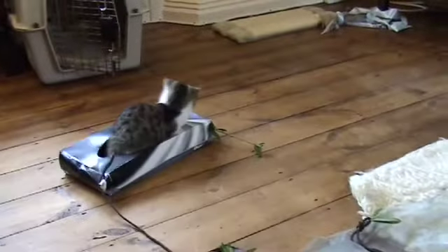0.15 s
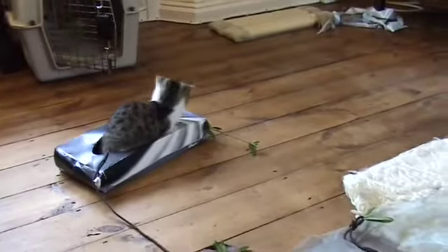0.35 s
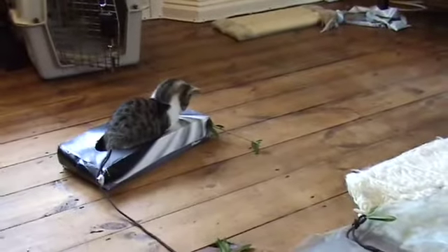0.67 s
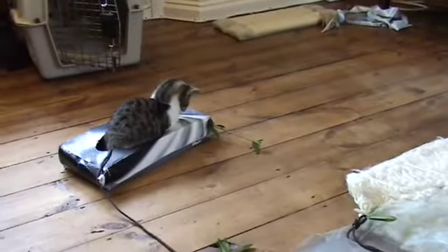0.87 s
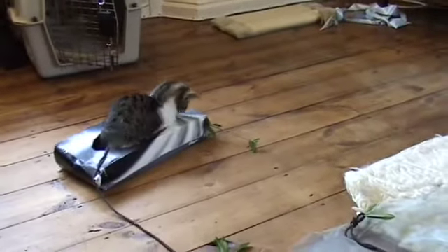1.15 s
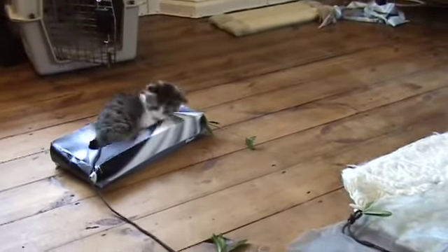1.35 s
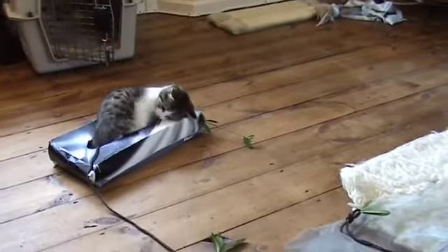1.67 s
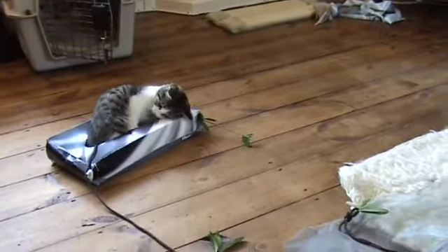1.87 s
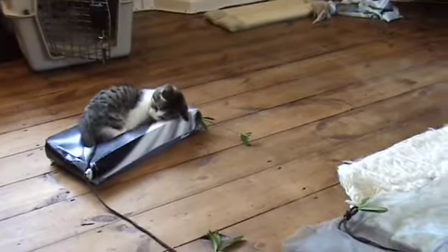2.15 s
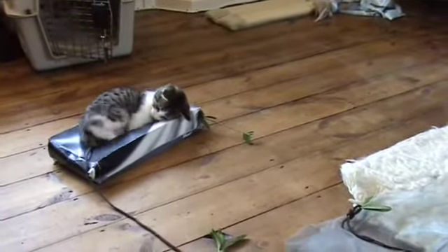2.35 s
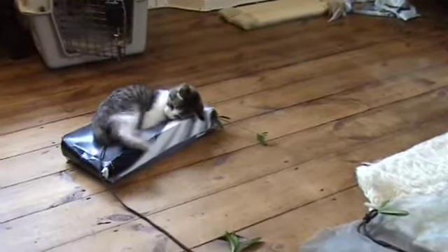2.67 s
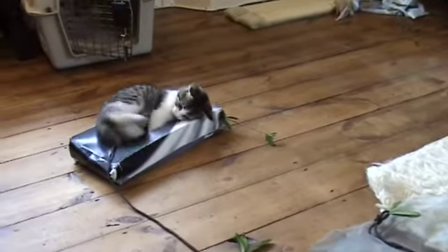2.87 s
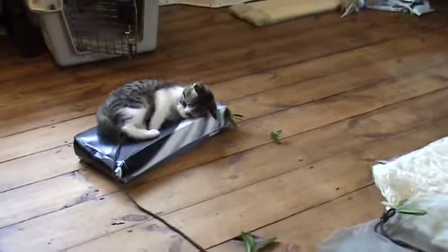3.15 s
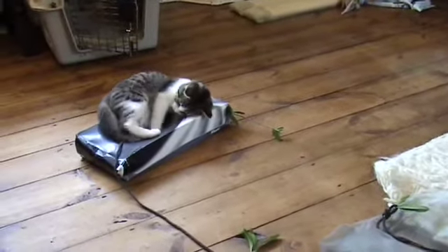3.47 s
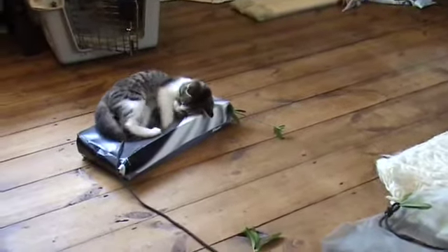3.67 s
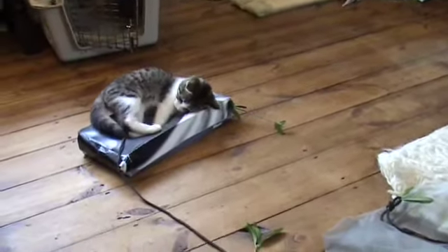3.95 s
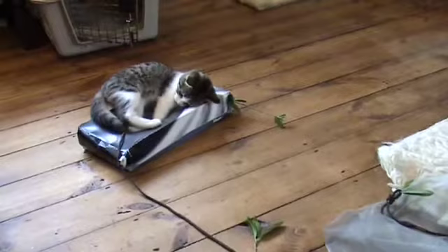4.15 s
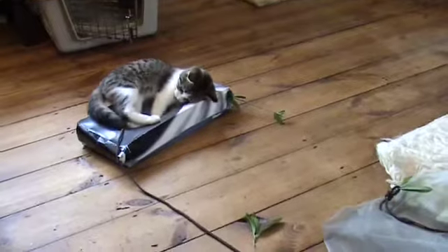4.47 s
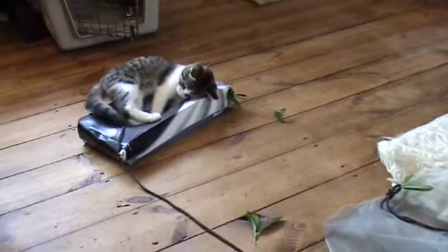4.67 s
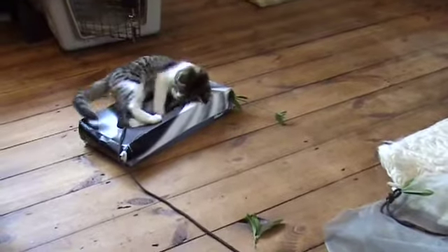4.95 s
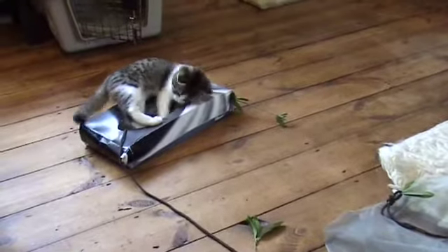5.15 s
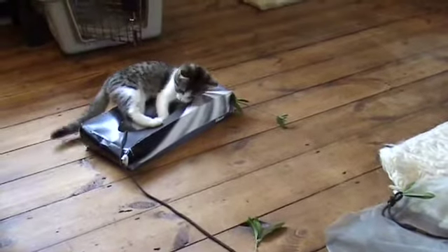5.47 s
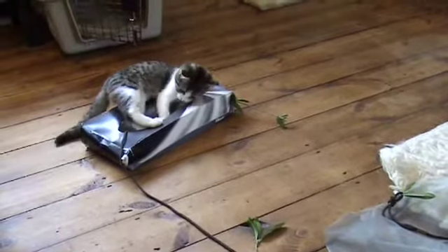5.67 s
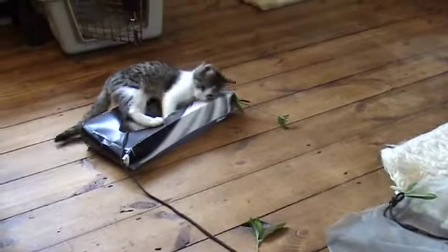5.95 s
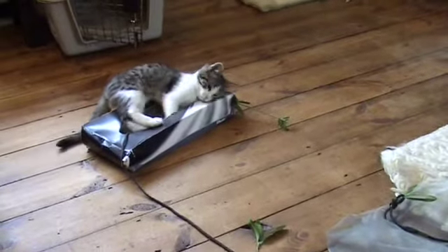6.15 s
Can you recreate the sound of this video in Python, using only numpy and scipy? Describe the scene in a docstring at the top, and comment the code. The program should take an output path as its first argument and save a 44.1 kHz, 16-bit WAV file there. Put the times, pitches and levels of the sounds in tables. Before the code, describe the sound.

In a small bare room with faint steady hiss, a kitten plays on a paper-wrapped hollow box on floorboards. At 0 s a strong boxy knock, paper crackle and low floor thud land together, followed by lighter taps and rustle until 0.35 s. It nearly quiets, with a tiny tap at 0.8 s. From 1.2 to 1.35 s comes a tight, heavy flurry of low knocks and scuffing, its first thump the strongest. Single pats with crisp snaps follow at 1.85, 1.95, 2.1 and 2.3 s. Softer scratches and taps run from 2.7 to 3.6 s, then one loud hollow knock at 3.7 s. Faint fidgeting and light taps fill 4.0 to 4.7 s. A brisk crinkly cluster strikes from 5.05 to 5.2 s, hardest last. After quiet, a snap with rustle at 5.82 s and small taps at 6.04 and 6.2 s end it. Short room echoes answer each hit.

```python
"""A small bare room where kittens paw at a paper-wrapped cardboard box and loose paper on a wooden floor.
Over a faint drifting hiss, dragged paper rustles as dense random micro-snaps that also shake the box.
Blows combine a decaying sine, ringing box modes and a noise snap of paper; landings ring floorboard modes.
Early echoes and a dense tail of shaped noise answer every blow, landing and rustle."""
import sys
import numpy as np
from scipy import signal
from scipy.fft import rfft, irfft
from scipy.io import wavfile
from scipy.ndimage import uniform_filter1d

SR = 44100
rng = np.random.default_rng(int(sys.argv[2]) if len(sys.argv) > 2 else 0)


def field_ratio(decibels):
    """Amplitude ratio for a level in dB (20 dB per decade); scalars and array-likes work."""
    return 10 ** (np.asarray(decibels, dtype=float) / 20)


def int16_out(signal):
    """Quantize to a 16-bit WAV file."""
    q = np.round(np.clip(np.atleast_2d(signal).T, -1, 1) * 32767)
    wavfile.write(sys.argv[1], SR, q.astype(np.int16))


N = 278712  # samples, about 6.3 s

# Resonances of the hollow box. Each row: nominal frequency in Hz, relative level in dB, t60 in seconds.
BOX_MODES = [(334, -6, 0.017), (360, -7, 0.098), (485, -12.5, 0.17), (560, 2.5, 0.019), (658, 3.5, 0.022),
             (765, 1, 0.012), (890, 12, 0.01), (1182, 14, 0.015), (1270, 7.5, 0.04), (1640, -40, 0.015)]
# Resonances of the floorboards. Each row: nominal frequency in Hz, relative level in dB, t60 in seconds.
BOARD_MODES = [(122, -13, 0.03), (153.3, 12, 0.069), (210, 24.5, 0.018)]
# The wrapping dragged under paws and claws. Each row: start of the hold in seconds, hold in seconds,
# relative rustle level in dB, relative push on the box in dB, brightness in dB per octave.
DRAGS = [(0.0, 0.011, -28, -20.5, -3.5), (.12, 0.097, -49, -39.5, -2.5), (.31, 0.033, -49, -33.5, -2),
         (.45, 0.18, -81, -55, -3), (.625, 0.077, -59.5, -57, 2), (.78, 0.07, -70, -61.5, 2),
         (1.177, 0.05, -36, -39, 2.5), (1.218, 0.063, -30.5, -31, -3), (1.361, 0.01, -37, -34.5, -3.5),
         (1.483, 0.01, -46.5, -39.5, -1.5), (1.598, 0.031, -43, -41.5, 1.5), (1.69, 0.093, -49, -49, 0.5),
         (1.86, 0.054, -47.5, -39.5, 0.5), (1.948, 0.013, -37, -36, -1), (2.127, 0.013, -43, -33, -3),
         (2.18, 0.093, -44, -44.5, 1), (2.308, 0.0067, -46.5, -37, -4.5),
         (2.708, 0.0052, -49.5, -45.5, 0.5), (2.879, 0.085, -57.5, -56.5, .6),
         (2.969, 0.014, -45.5, -39.5, 1), (3.3, .05, -53.5, -58, 0.5), (3.361, .12, -54, -55.5, 3),
         (3.512, 0.056, -57.5, -46, 1), (3.718, 0.041, -44, -33.5, 1.5), (4.02, 0.0054, -45.5, -50, -3),
         (4.304, 0.0089, -55.5, -52, 0.5), (4.378, 0.025, -42.5, -42, -2.5), (4.47, 0.12, -66, -53.5, 2),
         (4.64, 0.017, -47.5, -44.5, -0.7), (4.89, 0.068, -60.5, -58.5, 1.5),
         (4.98, 0.037, -50.5, -55.5, 1), (5.065, 0.01, -44.5, -38.5, -2.5), (5.13, 0.045, -56.5, -33, 0),
         (5.195, 0.023, -38, -35.5, -2.5), (5.27, 0.019, -48, -66, -6), (5.782, 0.0079, -45, -45.5, 3.5),
         (5.838, 0.0077, -30, -30, -3.5), (5.97, 0.085, -48.5, -68, 1.5), (6.048, 0.011, -37.5, -57, -5.5),
         (6.1, 0.018, -49, -46, 3), (6.191, 0.073, -40, -42, 0.5)]
TRAVEL_S = 0.002  # from the paws to the microphone


def evened(x):
    """Scales to rms 1."""
    return x / np.sqrt(np.mean(x ** 2) + 1e-20)


def peaked(x):
    """Scales to a peak of 1."""
    return x / abs(x).max()


def read(points, hz):
    """Reads a curve on a log-frequency axis."""
    f, value = np.transpose(points)
    return np.interp(np.log(hz + 1), np.log(f + 1), value)


def add(mix, s, sound):
    """Mixes a sound in at time s, in seconds."""
    part = mix[round(s * SR):][:len(sound)]
    part += sound[:len(part)]


def pair(z, other, points, hz):
    """Blends two independent spectra into two microphone ports that agree by the given likeness."""
    same = np.clip(read(points, hz), -1, 1)[:, None]
    mid, side = np.sqrt((1 + same) / 2), np.sqrt((1 - same) / 2)
    return np.array([mid * z + side * other, mid * z - side * other])


def high_pass(x, hz):
    """Causal bass cut, 18 dB per octave."""
    return signal.sosfilt(signal.butter(3, hz, "high", fs=SR, output="sos"), x)


def band(x, lo_hz, hi_hz):
    """Causal band-pass."""
    return signal.sosfilt(signal.butter(3, [lo_hz, hi_hz], "band", fs=SR, output="sos"), x)


def ring(modes, centre_hz, octaves, spot):
    """Dying modes, fed most near the centre; the spot and the paw's weight shift each level and pitch a little."""
    t = np.arange(SR // 8) / SR
    hz, db, t60 = np.transpose(modes)[:, :, None]
    level_shift, pitch_shift = spot[:len(modes), None], spot[-len(modes):, None]
    fed = field_ratio(db + 2.5 * level_shift) / (1 + (np.log2(hz / centre_hz) / octaves) ** 2)
    bent_hz = hz * (1 + 0.024 * pitch_shift)
    partials = fed * field_ratio(-60 * t / t60) * np.sin(2 * np.pi * bent_hz * t)
    return peaked(partials.sum(0))


def hiss():
    """Quiet house and microphone noise: coloured random spectra with patches that drift in level."""
    # Each row: frequency in Hz, relative density in dB per Hz.
    hiss_colour = [(15, -68), (25, -3), (132, -9), (227, -1), (281, -10.5), (368, -2), (432, -8.5),
                   (481, -5), (893, -10), (1270, -12), (4610, -22), (5870, -24.5), (15400, -36.5)]
    # Each row: frequency in Hz, left-right likeness from -1 to 1.
    hiss_likeness = [(60, -0.42), (240, -0.67), (950, -0.58), (3770, -0.26), (15000, 0.38)]
    frames, hz = N // 256 + 5, np.fft.rfftfreq(1024, 1 / SR)
    a, b, c, d, patches = rng.standard_normal((frames, 513, 5)).T
    patches = uniform_filter1d(uniform_filter1d(patches, size=10, axis=0), size=14, axis=1)
    patch_db = 1.8 * evened(patches)
    z = pair(a + 1j * b, c + 1j * d, hiss_likeness, hz)
    z = z * field_ratio(read(hiss_colour, hz)[:, None] + patch_db)
    noise = signal.istft(z, nperseg=1024, noverlap=768)[1][:, :N]
    return field_ratio(-51) * evened(noise)


def drags(t, peak_db, settles_db_per_s):
    """Power of every drag over time: a quick grip, a hold, a steady settling as the paw lets go."""
    start, held = np.transpose(DRAGS)[:2, :, None]
    grip_db = 684 * np.maximum(start - t, 0)  # rises at 684 dB per second
    settled_db = settles_db_per_s * np.maximum(t - start - held, 0)
    return field_ratio(peak_db[:, None] - grip_db - settled_db) ** 2


def rustle():
    """Dense uneven micro-snaps of the sheet, brighter when claws scrape; the same drag shakes box and boards."""
    # Base colour of the paper. Each row: frequency in Hz, relative density in dB per Hz.
    paper_colour = [(650, -34), (1100, -4.5), (1310, -11), (1670, -7), (2410, -8.5), (2820, -9.5),
                    (3550, -11), (6890, -13.5), (15400, -36.5)]
    # the kittens are never quite still: fidgeting lies under every drag
    fidget_sheet_db, fidget_box_db, fidget_db_per_octave = -78, -69, 12
    sheet_db, push_db, bright_db = np.transpose(DRAGS)[2:]
    size = field_ratio(3.4 * np.minimum(rng.exponential(1, (2, N)), 5)) * rng.standard_normal((2, N))

    snaps = size[0] * (rng.random(N) < 7000 / SR)  # about 7000 per second
    hz, t, z = signal.stft(snaps, SR, nperseg=256)
    sheet, still = drags(t, sheet_db, 211), field_ratio(fidget_sheet_db) ** 2
    sheet_power = sheet.sum(0) + still
    # the loudest drag sets the colour
    tilt_db = (np.clip(bright_db, -6, 8) @ sheet + fidget_db_per_octave * still) / sheet_power
    patches = rng.standard_normal(z.T.shape).T
    patches = evened(uniform_filter1d(uniform_filter1d(patches, size=5, axis=0), size=7, axis=1))
    octave = np.log2((hz[:, None] + 50) / 4500)
    colour = field_ratio(read(paper_colour, hz)[:, None] + octave * tilt_db)
    # tilting keeps the colour's mean power between 2 and 10 kHz
    colour /= np.sqrt((colour[(hz > 2000) & (hz < 10000)] ** 2).mean(0))
    paper = signal.istft(z * colour * field_ratio(2.43 * patches), SR, nperseg=256)[1][:N]

    shoves = size[1] * (rng.random(N) < 1100 / SR)  # about 1100 per second
    box = signal.oaconvolve(shoves, ring(BOX_MODES, 613, 0.39, np.zeros(len(BOX_MODES))))[:N]
    boards = signal.oaconvolve(shoves, ring(BOARD_MODES, 150, 3, np.zeros(len(BOARD_MODES))))[:N]
    # the box passes the push on to the floor
    shaken = evened(high_pass(box, 228)) + field_ratio(-15.5) * evened(boards)
    push_power = drags(t, push_db, 210).sum(0) + field_ratio(fidget_box_db) ** 2

    now = np.arange(N) / SR
    sheet_level = np.interp(now, t, np.sqrt(sheet_power))
    push_level = np.interp(now, t, np.sqrt(push_power))
    return sheet_level * evened(paper) + push_level * evened(shaken)


def blows():
    """Each blow: a short push at its centre pitch, the box ringing with it, and a snap of paper."""
    # Paw blows on the wrapped box. Each row: start in seconds, relative knock level in dB,
    # centre of the knock in Hz, relative snap level in dB, treble of the snap against its body in dB.
    paw_blows = [(.001, -4, 614, -14, -2.5), (.115, -18.5, 554, -20.5, -0.5), (0.148, -21, 930, -35, 8),
                 (.215, -29, 504, -47, 5), (.287, -18.5, 665, -19.5, -5.5), (.345, -25, 315, -21.5, -6),
                 (.799, -30, 704, -37.5, -16), (.805, -39.5, 270, -54.5, -15), (1.189, -29, 330, -43, 0.5),
                 (1.213, -20, 390, -28, 7), (1.239, -2.5, 375, -24, -10), (1.248, -9, 368, -30, -5),
                 (1.257, -26, 357, -19, 1), (1.274, -10, 369, -30, -11), (1.296, -13, 373, -27, -5),
                 (1.312, -15.5, 364, -38, -8), (1.328, -11.5, 432, -14, -8), (1.434, -19, 770, -26, 0),
                 (1.576, -28.5, 654, -38, 7), (1.738, -28, 455, -41, 10.5), (1.839, -10, 704, -17.5, -6.5),
                 (1.932, -15, 1130, -7, 0), (2.102, -17.5, 524, -24.5, -6), (2.277, -18.5, 475, -37, -15),
                 (2.284, -24, 490, -21, -0.5), (2.695, -40, 743, -42.5, 9.5), (2.729, -36.5, 274, -54, -5),
                 (2.963, -25, 705, -37, -16), (2.98, -28.5, 340, -34, 2), (3.17, -42, 665, -44, -5),
                 (3.413, -42, 467, -26, 3.5), (3.523, -21, 336, -31.5, -13), (3.535, -25, 343, -51, -12),
                 (3.599, -42, 330, -58, -11), (3.701, -1, 648, -13.5, 2), (4.019, -52, 910, -34, 1.5),
                 (4.035, -45, 910, -38, -2), (4.235, -36, 467, -67, -9), (4.366, -24.5, 850, -32, 4),
                 (4.545, -34, 530, -49, 6), (4.598, -26, 560, -38, 7), (4.653, -25, 530, -30.5, -13),
                 (5.047, -18, 505, -17, 1.5), (5.116, -16, 553, -20, -16), (5.157, -17.5, 670, -10.5, -3),
                 (5.19, -7.5, 533, -16, -9), (5.259, -35, 440, -23.5, -2), (5.478, -45, 484, -40.5, -6),
                 (5.595, -36.5, 560, -68, -2), (5.819, -14, 583, -16.5, 0),
                 (6.037, -25.5, 550, -20.5, -0.5), (6.184, -48, 800, -41, 18), (6.206, -20, 556, -16.5, -1)]
    split_hz, snap_top_hz = 3560, 7800  # body and treble of a snap
    out, t = np.zeros(N), np.arange(2048) / SR
    chance = rng.standard_normal((len(paw_blows), 2048 + 2 * len(BOX_MODES)))
    for (s, knock_db, hz, snap_db, treble_db), row in zip(paw_blows, chance):
        knock = field_ratio(16.5) * ring(BOX_MODES, hz, 0.41, row[2048:])
        knock[:2048] += np.sin(2 * np.pi * hz * t) * np.exp(-t * hz / 5.8)  # decays by 1/e in 5.8 cycles
        # a soft pad gives a round knock with no edge
        knock = peaked(band(knock, 0.6 * hz, 3.0 * hz))
        add(out, s + TRAVEL_S, field_ratio(knock_db) * knock)

        crackle = row[:2048] * np.exp(-t / 0.0046)  # the sheet buckles while the paw is on it
        crackle[0] += 14  # sharp first click
        body = peaked(band(crackle, 1270, split_hz))
        treble = peaked(band(crackle, split_hz, snap_top_hz))
        add(out, s + TRAVEL_S, field_ratio(snap_db) * (body + field_ratio(treble_db) * treble))
    return out


def thuds():
    """Each landing of a kitten's weight sets the floorboards ringing."""
    # Each row: start in seconds, relative thud level in dB.
    landings = [(.001, -14), (.115, -40), (0.347, -40), (1.239, -9), (1.254, -35), (1.296, -29),
                (1.327, -27), (1.433, -39), (1.839, -26.5), (1.931, -33.5), (2.102, -28), (2.284, -33),
                (2.722, -35.5), (2.964, -29.5), (2.98, -32.5), (3.512, -31), (3.536, -29), (3.701, -27),
                (4.654, -40), (5.047, -24), (5.117, -35), (5.19, -30.5)]
    out = np.zeros(N)
    spots = rng.standard_normal((len(landings), 2 * len(BOARD_MODES)))
    for (s, thud_db), spot in zip(landings, spots):
        add(out, s + TRAVEL_S, field_ratio(thud_db) * ring(BOARD_MODES, 153, 0.75, 0.16 * spot))
    return out


def ports(x):
    """The near sound meets the two ports with opposite phase shifts that vary with frequency."""
    # Each row: frequency in Hz, side signal as a share of the middle.
    side_share = [(300, 0.046), (1300, 0.16), (4400, 0.24), (8100, 0.61), (11000, 0.17)]
    hz = np.fft.rfftfreq(N, 1 / SR)
    side = irfft(1j * read(side_share, hz) * rfft(x), N)  # a quarter cycle from the middle
    return np.array([x + side, x - side])


def tail():
    """A few strong early echoes, and a dense noise tail that dies band by band."""
    # Each row: frequency in Hz, t60 in seconds.
    room_decay = [(100, 0.66), (300, 0.29), (700, 0.5), (1800, 0.45), (5000, 0.49), (12000, 0.3)]
    # Each row: frequency in Hz, left-right likeness from -1 to 1.
    room_likeness = [(100, 0.98), (500, 0.99), (1500, 0.73), (4000, 0.68), (9000, 0.08), (14000, 0.73)]
    # Floor and nearest walls. Each row: nominal delay in milliseconds, level in dB.
    echoes = [(2.5, -6), (7, -8.5), (14, -8), (22, -13.5), (30, -13.5)]
    hz, t, z = signal.stft(rng.standard_normal((2, SR)), SR, nperseg=256)
    z = pair(z[0], z[1], room_likeness, hz) * field_ratio(-60 * t / read(room_decay, hz)[:, None])
    late = signal.istft(z, SR, nperseg=256)[1][:, :SR]
    late *= np.clip(np.arange(SR) / SR / 0.011 - 0.3, 0, 1)  # the tail builds after the direct sound
    late *= field_ratio(-5.0) / np.linalg.norm(late[0])
    for ms, db in echoes:
        at = round(ms * rng.uniform(0.85, 1.15) * SR / 1000)
        right_lag = rng.integers(-1, 2)  # at most one sample either way
        late[[0, 1], at + right_lag * np.arange(2)] += rng.choice([-1, 1]) * field_ratio(db)
    return late


def room(x):
    """The paws never land twice on one spot: three tails take turns, their squared shares adding to 1."""
    turn = 2 * np.pi * np.arange(N) / SR / 0.37  # one turn in 0.37 s
    shares = [np.sqrt(2 / 3) * np.cos(turn + k * np.pi / 3) for k in range(3)]
    return sum(signal.fftconvolve((x * share)[None], tail(), axes=1)[:, :N] for share in shares)


def scene():
    """The kittens play slightly to the right; such small things radiate no deep bass."""
    play = high_pass(blows() + thuds() + rustle(), 127)
    lean = field_ratio(np.array([[-0.2], [0.2]]))  # left and right
    return (ports(play) + room(play)) * lean + hiss()


def roll_off(x):
    """The treble ends steeply here."""
    return signal.sosfilt(signal.butter(12, 15600, fs=SR, output="sos"), x)


def record(dry):
    """The loudest blows round off in the input stage, a tanh curve."""
    rounded = np.tanh(dry / 1.376) * 1.399
    return roll_off(rounded)


dry = scene()
out = record(dry)
int16_out(out)
```